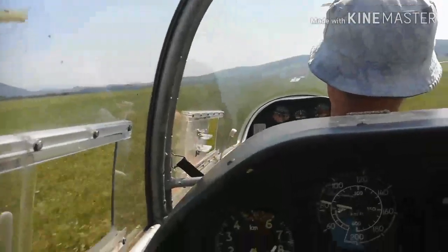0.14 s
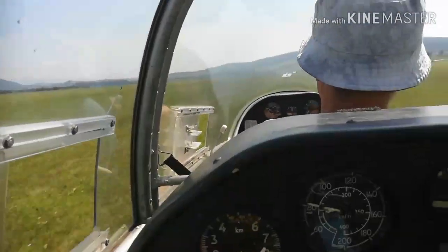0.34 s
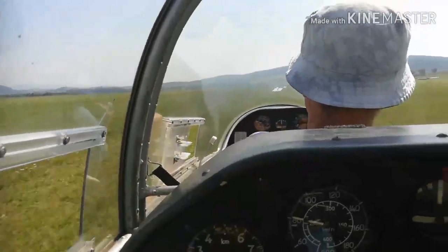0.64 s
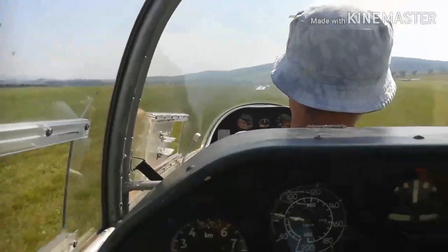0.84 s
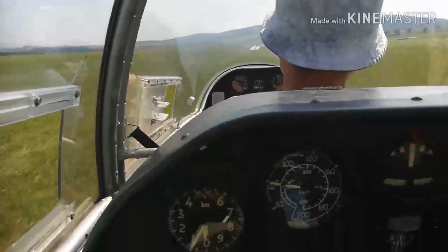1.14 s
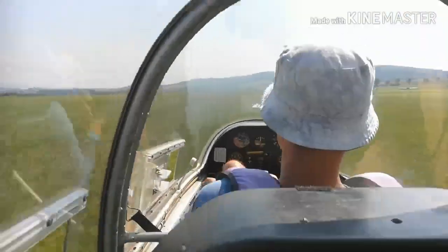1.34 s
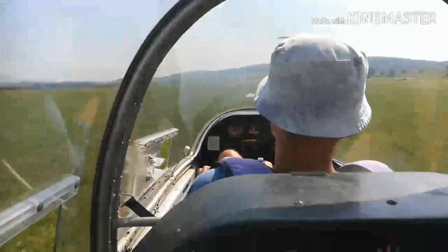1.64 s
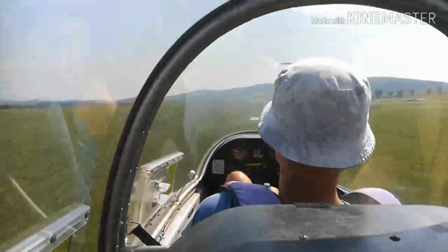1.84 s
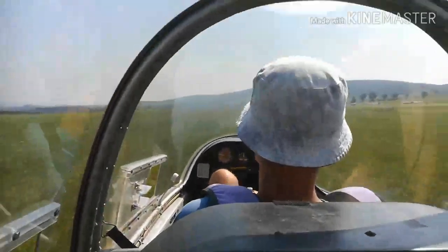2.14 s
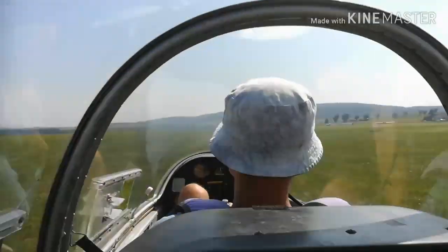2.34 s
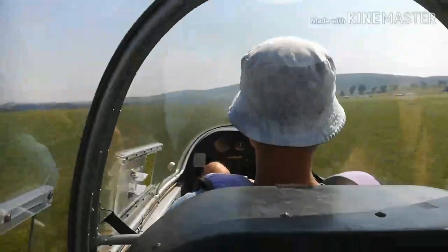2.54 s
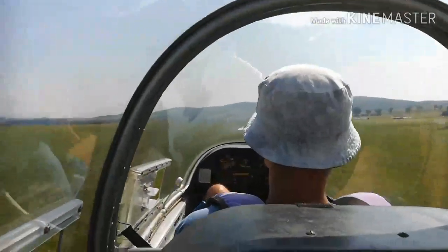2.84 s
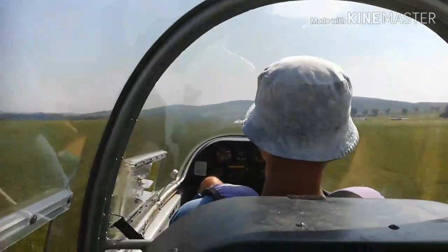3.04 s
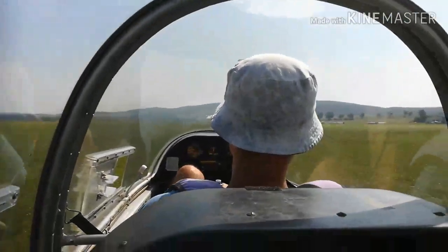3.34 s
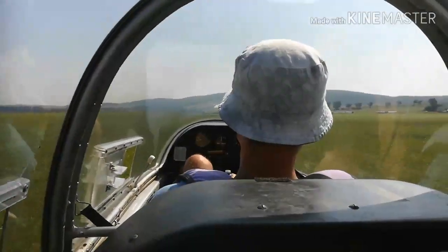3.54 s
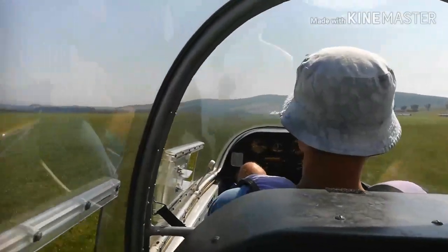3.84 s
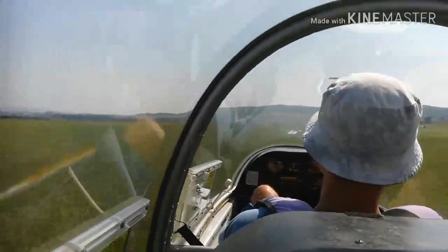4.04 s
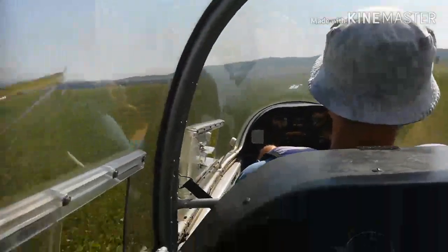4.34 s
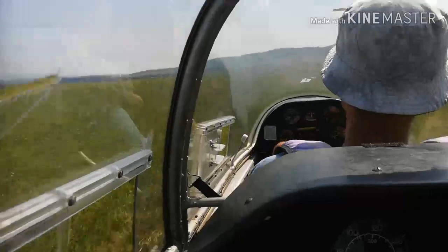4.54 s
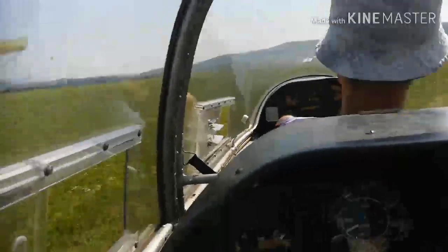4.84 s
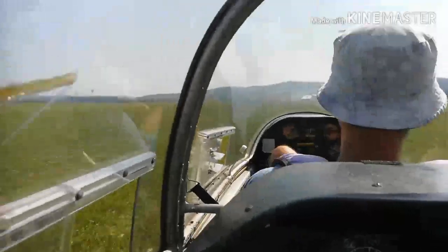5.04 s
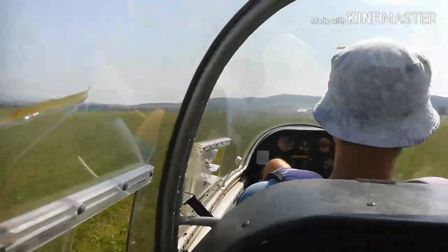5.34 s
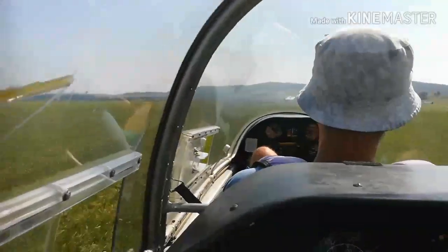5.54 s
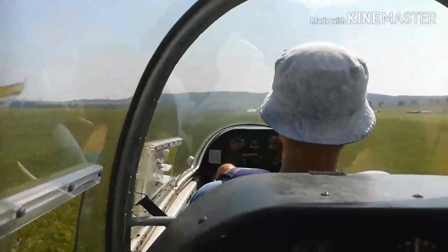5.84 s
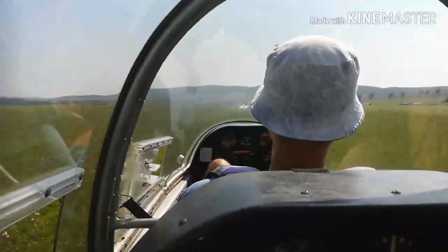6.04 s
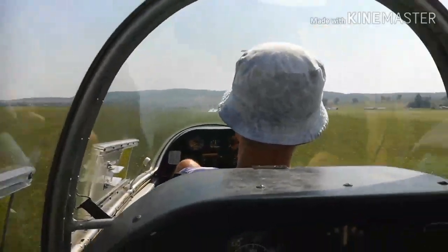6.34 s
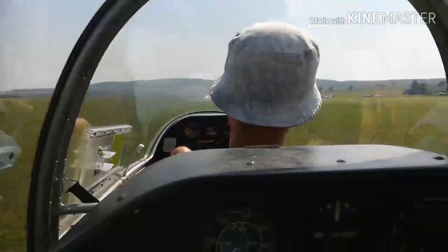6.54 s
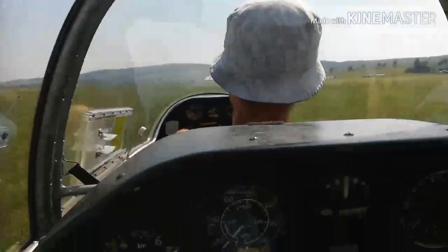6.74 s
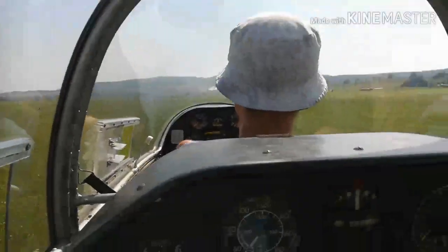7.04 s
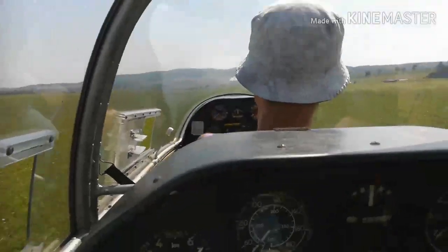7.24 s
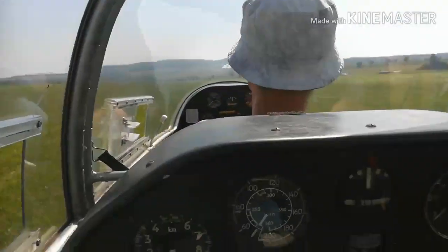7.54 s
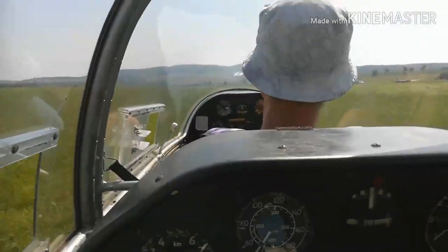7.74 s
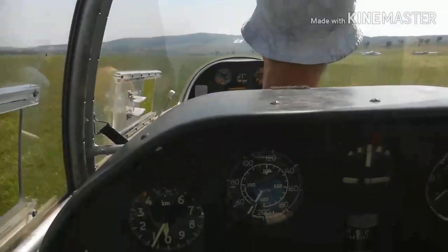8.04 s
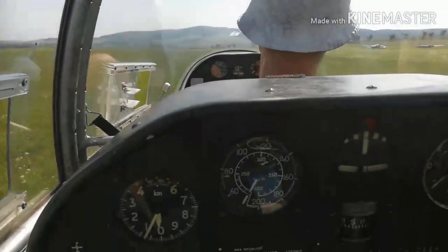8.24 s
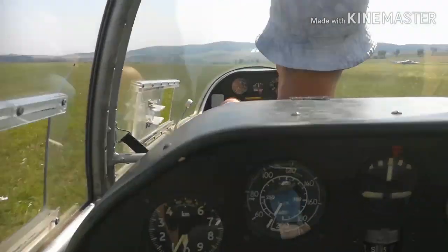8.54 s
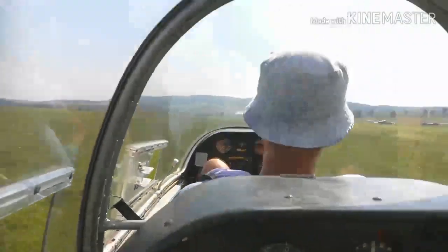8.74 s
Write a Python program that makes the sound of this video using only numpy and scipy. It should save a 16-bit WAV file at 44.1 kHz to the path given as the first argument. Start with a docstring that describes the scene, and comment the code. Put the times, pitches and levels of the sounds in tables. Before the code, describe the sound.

A handheld stereo microphone in a cramped, hollow cabin hears bass-heavy, lumpy rumbling from the wheel on turf. It is loudest at first, with broad mid drumming and soft hiss; a massive dropping thump distorts around 1.8 seconds. The roll then slows: hiss and drumming sink, while small knocks, bright ticks and dull tuft bumps stand out, with brief dragging scrapes close to eight seconds.

```python
"""Glider rollout over rough grass

Inside the cockpit of a glider that rolls out over rough grass and slows down.
Bumps under the wheel boom in the hollow fuselage and drum its skin: noise through resonances and spectra.
Shaped noise makes the hiss of air and grass; short noise bursts make loose fittings knock, tick and ping.
The belly scrapes through tufts, and one hard jolt, a falling sine, overloads the two-port microphone."""
import sys
import numpy as np
from scipy import signal
from scipy.fft import rfft, irfft, next_fast_len
from scipy.io import wavfile
from scipy.ndimage import uniform_filter1d

SR = 44100
rng = np.random.default_rng(int(sys.argv[2]) if len(sys.argv) > 2 else 0)


def dump_mix(stems):
    """Bounce the given channels to the path in sys.argv[1] as a 16-bit WAV at rate SR."""
    frames = np.atleast_2d(stems).T  # one column per channel
    limited = np.clip(frames, -1, 1)  # hard clip at full scale
    pcm = np.round(limited * 32767).astype(np.int16)
    wavfile.write(sys.argv[1], SR, pcm)


def linear_from_db(decibels):
    """Turn decibels (scalar or array-like) into linear amplitude factors; 0 gives 1."""
    return 10 ** (np.asarray(decibels, float) / 20)


N = 392049

# rolling boom as the ground changes and the speed falls: (time [s], wheel boom [dB], shell boom [dB])
ROLL_LEVELS = [(0.0, -16, -14.5), (0.3, -23.5, -18.5), (0.8, -20, -14), (1.05, -17, -21.5), (1.5, -16, -18),
               (1.78, -17, -18.5), (1.92, -25, -24), (2.35, -17, -22), (2.55, -25, -23.5),
               (3.55, -20, -22.5), (3.72, -22, -27), (3.9, -24, -22.5), (4.5, -15, -24.5), (5.1, -18, -23),
               (5.65, -21.5, -24), (6.75, -18, -29.5), (7.3, -19, -26), (7.52, -19.5, -28.5),
               (7.575, -15.5, -24.5), (7.63, -19.5, -33.5), (7.72, -25, -30.5), (7.79, -14, -35),
               (7.83, -23.5, -18.5), (7.95, -19.5, -26), (8.07, -23.5, -24), (8.13, -17.5, -27.5),
               (8.25, -20, -32), (8.89, -17.5, -32)]
# heavy airframe modes under the seat: (frequency [Hz], width before widening [Hz], level [dB])
FRAME_MODES = [(39.3, 23.5, 2.5), (52, 13.6, -3.5), (61.3, 5.1, -6.5), (69.5, 22.7, -1.5), (88, 53.3, -5.5)]
# hollow shell modes: (frequency [Hz], width before widening [Hz], level [dB])
SHELL_MODES = [(113.8, 68, 2.5), (155.1, 38.2, 0.5), (202.5, 32.8, 1.5), (232.6, 46, 1.5), (278, 77, -7.5),
               (331, 104, -17.5), (425, 172, -17)]
# spectrum of the drumming skin: (frequency [Hz], relative density [dB per Hz])
SKIN_SPECTRUM = [(260, -51), (450, -14), (613, -2), (709, -3), (1020, -7), (1170, -10), (1590, -10),
                 (2160, -13), (2320, -16.5), (3500, -24.5), (4550, -27), (7700, -120)]
# spectrum of air and grass: (frequency [Hz], relative density [dB per Hz])
HISS_SPECTRUM = [(1290, -51), (2200, -24), (2940, -13.5), (3300, -10.5), (7050, -12), (9490, -19.5),
                 (11000, -31), (14300, -64), (22000, -120)]
# thin top of the hiss: (frequency [Hz], relative density [dB per Hz])
TOP_SPECTRUM = [(8000, -39), (10500, 4.5), (13300, 0.5), (14600, 3), (15300, 4), (16000, -22)]
# noise beds: (time [s], skin drumming [dB], hiss of air and grass [dB], thin top of the hiss [dB])
RUSH_LEVELS = [(0.0, -36, -49.5, -64), (0.99, -35.5, -52.5, -67), (1.46, -36.5, -49.5, -61),
               (1.71, -36.5, -50.5, -66), (2.08, -41, -54.5, -67), (2.47, -42.5, -55.5, -70),
               (3.17, -42.5, -51, -63), (3.76, -43, -52, -65.5), (4.06, -42, -52.5, -65),
               (4.21, -42, -55, -65), (5.1, -43.5, -55.5, -68), (5.54, -43.5, -52, -65.5),
               (5.97, -45, -57, -70.5), (7.33, -47, -58.5, -71), (7.65, -49, -56.5, -70),
               (7.92, -47.5, -55, -68), (8.42, -50.5, -63.5, -76), (8.89, -49, -59, -72)]
# panels that a loose fitting knocks: (frequency [Hz], level [dB], ring scale [s]); width is inverse to the scale
PANEL_MODES = [(715, 7.5, 0.08), (875, 5.5, 0.057), (1050, -3.5, 0.072), (1320, -5.5, 0.035),
               (1620, -2.5, 0.069), (1980, -2, 0.018), (2114, -4, 0.18), (2396, -4, 0.016),
               (3080, -14, 0.011), (4020, -9, 0.005), (4920, -4.5, 0.0048), (6360, -32, .01)]
# single knocks: (time [s], level of the first 700 samples [dB], loudest region [Hz])
KNOCK_HITS = [(0.2014, -32, 1200), (0.205, -30.5, 2250), (0.211, -26.5, 1450), (0.26, -35, 1270),
              (1.803, -32, 1340), (1.812, -31, 900), (1.824, -32.5, 1560), (1.832, -35, 1300),
              (1.845, -36.5, 1800), (1.858, -35, 1060), (2.0596, -42, 1300), (3.95, -36, 1290),
              (3.958, -41, 2300), (3.967, -53, 1210), (4.239, -41, 1120), (4.362, -55.5, 2530),
              (4.445, -43, 1830), (4.522, -35.5, 1000), (4.54, -42, 1600), (4.623, -43, 1140),
              (4.6545, -41.5, 2170), (4.7256, -55, 2000), (4.801, -46, 2000), (4.9446, -48, 1800),
              (5.014, -44, 2180), (5.315, -39, 1120), (5.3322, -38.5, 1820), (5.3507, -36, 1840),
              (5.372, -41.5, 1300), (5.388, -41, 1100), (5.4047, -35, 1860), (5.411, -38, 1290),
              (5.4174, -37.5, 1820), (5.426, -40.5, 1090), (5.434, -38, 990), (5.461, -43, 1620),
              (5.48, -44, 1350), (5.534, -40, 1640), (6.035, -53, 1500), (6.062, -45, 1600),
              (6.1075, -41.5, 1350), (6.142, -49, 1400), (6.157, -42.5, 1700), (6.2116, -39.5, 1860),
              (6.258, -46, 1690), (6.4484, -42.5, 1700), (6.469, -43, 1840), (6.663, -45, 1710),
              (6.69, -43, 1770), (6.7087, -42, 1700), (6.7623, -49, 1500), (6.795, -47, 1700),
              (6.866, -53, 1500), (6.93, -42.5, 1700), (6.952, -48, 1500), (7.003, -55, 1600),
              (7.027, -46.5, 1300), (7.047, -49, 1700), (7.088, -47, 1790), (7.111, -40, 1580),
              (7.1802, -40.5, 1710), (7.211, -42.5, 1730), (7.221, -47, 2480), (7.278, -51, 1400),
              (7.394, -43.5, 1500), (7.438, -46, 1700), (7.4945, -41.5, 1720), (7.5097, -41, 1600),
              (7.523, -42, 1400), (7.535, -39, 1690), (7.559, -43, 1590), (7.769, -45.5, 2200),
              (7.929, -50, 2220), (8.038, -54, 2820), (8.232, -43, 1510), (8.242, -45.5, 1300),
              (8.331, -42.5, 1000), (8.605, -49, 1500), (8.675, -45.5, 1100), (8.7715, -44, 1980),
              (8.781, -43, 2610), (8.791, -42.5, 1500), (8.815, -54, 1500)]
# bright ticks of small parts: (time [s], level [dB], brightness [dB before each band takes its share])
TICK_HITS = [(0.2, -22, 0), (0.4973, -35, -1), (0.5222, -31, 2.5), (0.7906, -30.5, 0), (1.4162, -31.5, 4),
             (1.7946, -22, -3), (1.8015, -30, 22), (1.8154, -30, -16), (1.829, -36, -9),
             (1.8794, -30, -1.5), (2.035, -27, 3), (2.6833, -33, 3), (2.7696, -41, 9), (2.8524, -37, 10),
             (3.1694, -34, 8), (3.2695, -36, 7), (3.4471, -47, 14), (3.919, -39, 9), (3.949, -35, -4),
             (4.1094, -32, 3), (4.1659, -33, 1), (4.365, -40, 12), (4.6506, -27.5, 1), (4.8005, -33.5, -1),
             (4.9721, -33.5, 4), (5.3018, -41.5, 18), (5.33, -36, -6), (5.409, -30, 0), (5.4144, -41, 10),
             (5.8494, -43, 13), (6.2043, -44, 14), (6.222, -38, -1), (6.375, -38, 0), (6.69, -37, -2),
             (6.935, -41, -2), (7.355, -36, -2), (7.512, -40, 3), (7.878, -30, 5), (8.1244, -41, 12),
             (8.184, -37, 7), (8.33, -46, -5), (8.4915, -48, -3), (8.557, -26.5, 5.5), (8.5969, -40, 15),
             (8.6532, -38, -1)]
# spectrum of a tick: (frequency [Hz], relative density [dB per Hz])
TICK_SPECTRUM = [(1500, -48), (2500, -9), (4200, -8), (5200, -5), (8500, 2.5), (12000, -18.5), (16000, -16)]
# hard jolt: (time [s], starting swing, first pitch [Hz], last pitch [Hz], pitch fall constant [s], t60 [s])
JOLT_THUMP = (1.7965, 1.9, 155, 28, .012, .12)
# the shell rings with the jolt: (frequency [Hz], starting swing, t60 [s])
JOLT_SHELL_RING = (270, 0.34, 0.085)
# single tufts that thump the shell: (time [s], level before the soft rise [dB])
TUFT_BUMPS = [(0.467, -7), (0.644, -20), (0.777, -17.5), (0.901, -10), (1.281, -6), (1.345, -30),
              (1.609, -24), (1.795, 5.5), (2.26, -26), (2.544, -30), (3.425, -18.5), (3.773, -9),
              (3.858, -11), (4.147, -4), (4.712, -28), (5.312, -3.5), (5.383, -9.5), (6.246, -14),
              (6.492, -12.5), (7.537, -9), (7.741, -18.5), (8.285, -27), (8.66, -17), (8.813, -16.5)]
# the belly drags through a tuft: (time [s], level [dB], hold length [s])
TUFT_DRAGS = [(7.811, -34, .105), (7.928, -33, .085), (8.025, -37, .04)]
# resonances of the dragged belly: (frequency [Hz], width before widening [Hz], level [dB])
BELLY_MODES = [(453, 66, 4), (600, 105, 6), (900, 160, 0), (1300, 380, -5)]
# a small metal part pings: (time [s], level [dB])
PING_HITS = [(5.3991, -37), (8.2287, -40)]
# modes of that part: (frequency [Hz], level [dB], t60 [s])
PING_MODES = [(4850, 1, 0.03), (7440, -4, 0.025)]
# noise bands that come and go: (time [s], half length [s], frequency [Hz], filter width [Hz], level [dB])
HUM_BANDS = [(.62, .25, 875, 25, -45), (3.67, .1, 7600, 120, -66), (4.12, .06, 7450, 150, -65),
             (3.35, .1, 4900, 100, -66), (3.4, .13, 3200, 90, -62), (6.9, .9, 8250, 80, -75),
             (3.5, .75, 15200, 500, -72)]
# how far the two ports hear the same sound: (frequency [Hz], likeness [0 to 1])
PORT_LIKENESS = [(30, .999), (80, 1), (140, 0.99), (230, 0.96), (350, 0.57), (700, 0.65), (1500, 0.2),
                 (4000, 0.041), (15000, 0.14)]
# lead of the left port in the shared sound: (frequency [Hz], phase [radians])
PORT_LEAD = [(0, 0), (260, 0), (690, 3.5), (1120, 6.2), (1600, 6.7), (2700, 3.2), (4400, 3.3), (6900, 4.8)]
# balance of the ports: (frequency [Hz], left minus right [dB])
PORT_TILT = [(60, 0.5), (110, -1), (200, 0.0), (380, 2), (700, 1.5), (1290, -5.5), (2380, -3.5),
             (4400, 0.5), (8120, 6.5), (15000, 3)]


def evened(x):
    """Scales to rms 1."""
    return x / np.sqrt(np.mean(x ** 2) + 1e-20)


def read(points, hz):
    """Reads a table on a log-frequency axis."""
    f, value = np.transpose(points)
    return np.interp(np.log(hz + 1), np.log(f + 1), value)


def colour(x, points):
    """Shapes the spectrum by a table of dB."""
    size = next_fast_len(N)
    gain = linear_from_db(read(points, np.fft.rfftfreq(size, 1 / SR)))
    return irfft(rfft(x, size) * gain, size)[..., :N]


def ring(x, hz, width):
    """One resonance with gain near 1 at its centre."""
    r = np.exp(-np.pi * width / SR)
    return signal.lfilter([1 - r, 0, r - 1], [1, -2 * r * np.cos(2 * np.pi * hz / SR), r * r], x)


def ring_twice(x, hz, width):
    """The same resonance applied twice for steep skirts, at rms 1."""
    return evened(ring(ring(x, hz, width), hz, width))


def dull(x, edge_hz):
    """Heavy panels radiate little above edge_hz."""
    return signal.sosfilt(signal.butter(2, edge_hz, fs=SR, output="sos"), x)


def wander(per_s):
    """Slow chance of rms 1 that changes about per_s times a second."""
    size = int(SR / per_s)
    return evened(uniform_filter1d(uniform_filter1d(rng.standard_normal(N), size), size))


def bursts(times, gains, t60s, rise_s):
    """Envelope of quick rises and exponential decays."""
    env = np.zeros(N)
    for start, gain, t60 in zip(times, gains, t60s):
        part = env[round(start * SR):][:round(t60 * SR)]
        u = np.arange(len(part)) / SR
        part += gain * linear_from_db(-60 * u / t60) * (1 - np.exp(-u / rise_s))
    return env


def levels(table, t):
    """Gain curves from a table of times and dB columns."""
    times, *columns = np.transpose(table)
    return [linear_from_db(np.interp(t, times, db)) for db in columns]


def hum(t):
    """Narrow bands of noise come and go."""
    out = np.zeros((2, N))
    for s, half_length, hz, width, db in HUM_BANDS:
        swell = np.exp(-((t - s) / half_length) ** 4)
        out += linear_from_db(db) * swell * ring_twice(rng.standard_normal((2, N)), hz, width)
    return out


def rush(points, shake, shake_db, patchy_db, streaky_db):
    """Noise that follows the shaking, uneven in broad patches and in narrow, longer-lasting streaks."""
    frames = N // 256 + 6
    real, imag = rng.standard_normal((2, 2, 513, frames))
    # patches span many frequency bins; streaks stay in one bin and last longer
    patches = uniform_filter1d(uniform_filter1d(rng.standard_normal((513, frames)), 32, 0), 10, 1)
    streaks = uniform_filter1d(rng.standard_normal((513, frames)), 25, 1)
    field = linear_from_db(patchy_db * evened(patches) + streaky_db * evened(streaks))
    noise = signal.istft((real + 1j * imag) * field, nperseg=1024, noverlap=768)[1][:, :N]
    return evened(colour(noise * linear_from_db(shake_db * shake), points))


def chatter():
    """Many weak knocks of the same panels, in clumps."""
    hit = rng.random(N) < 70 * linear_from_db(3 * wander(per_s=8)) / SR
    strength = linear_from_db(1.3 * np.minimum(rng.exponential(1, N), 3))
    decay_s = 0.006
    env = signal.lfilter([1], [1, -np.exp(-1 / (decay_s * SR))], hit * strength)
    blows = env * rng.standard_normal((2, N))
    panels = sum(linear_from_db(db) * ring(blows, hz, 2.0 / scale_s) for hz, db, scale_s in PANEL_MODES)
    return linear_from_db(-59.0) * evened(dull(panels, edge_hz=3400))


def ticks(hiss):
    """Sharp puffs of treble in two bands for brightness, plus a faint sprinkle that follows the hiss."""
    s, db, bright_db = np.transpose(TICK_HITS)
    faint = rng.random((130, 3))  # chance of time, level and decay
    at = faint[:, 0] * (N - 1) / SR
    sprinkle = hiss * bursts(at, linear_from_db(6 * faint[:, 1] - 7), .04 + .05 * faint[:, 2], rise_s=.005)
    puff = evened(colour(rng.standard_normal((2, N)), TICK_SPECTRUM))
    split_hz = 8000
    upper = signal.sosfilt(signal.butter(2, split_hz, "high", fs=SR, output="sos"), puff)
    lower = signal.sosfilt(signal.butter(2, split_hz, "low", fs=SR, output="sos"), puff)
    out = np.zeros((2, N))
    for share, band, t60 in ((0.28, upper, 0.073), (-0.06, lower, 0.09)):
        env = bursts(s, linear_from_db(db + share * bright_db), [t60] * len(s), rise_s=0.004)
        out += (sprinkle * linear_from_db(-1.2 * share) + env) * band
    return out


def pings():
    """Short, slightly rough modes of a small part."""
    s, db = np.transpose(PING_HITS)
    out = np.zeros((2, N))
    for hz, level_db, t60 in PING_MODES:
        env = bursts(s, linear_from_db(db + level_db), [t60] * len(s), rise_s=.0015)
        out += env * evened(ring(rng.standard_normal((2, N)), hz, 250))
    return out


def knocks():
    """A soft-edged blow and an uneven rattle drive damped panel modes near a loudest region, plus a broad crunch."""
    out = np.zeros((2, N))
    size = 4000  # samples
    u = np.arange(size) / SR
    rattle_s, rattle_spread = 0.021, 0.15  # decay of the rattle, and its log spread from knock to knock
    focus_db = 3  # loss per octave away from the loudest region
    crunch_hz, crunch_db = (1000, 4430), -11  # band, and gain beside the modes
    crunch_band = signal.butter(1, crunch_hz, "band", fs=SR, output="sos")
    for s, db, centre_hz in KNOCK_HITS:
        length = rattle_s * np.exp(rattle_spread * rng.standard_normal())
        uneven = linear_from_db(1.6 * evened(uniform_filter1d(rng.standard_normal(size), 130)))  # bounces of about 3 ms
        env = (np.exp(-u / length) + 0.7 * np.exp(-u / 0.007)) * (1 - np.exp(-u / 0.0013))
        blows = rng.standard_normal((2, size)) * uneven * env
        # the firm blow: a short tone pulse, a quarter turn apart in the two draws
        pulse = np.exp(-((u - .002) / .001) ** 2)
        blows += 1.8 * pulse * np.cos(2 * np.pi * centre_hz * u - [[0], [np.pi / 2]])
        panels = np.zeros((2, size))
        for hz, level_db, scale_s in PANEL_MODES:
            width = 5.5 / scale_s
            gain = linear_from_db(level_db - focus_db * abs(np.log2(hz / centre_hz)))
            panels += gain * ring(blows, hz * rng.uniform(0.93, 1.07), width) / np.sqrt(width)
        crunch = evened(signal.sosfilt(crunch_band, blows))
        sound = evened(dull(panels, edge_hz=4560)) + linear_from_db(crunch_db) * crunch
        part = out[:, round(s * SR):][:, :size]
        part += (linear_from_db(db) * sound / np.std(sound[:, :700]))[:, :part.shape[1]]
    return out


def drags(t):
    """Rough scraping that starts at once, holds and lets go, through the belly's resonances."""
    env = np.zeros(N)
    for s, db, length in TUFT_DRAGS:
        start = np.clip((t - s) / 0.0022, 0, 1)
        sag = linear_from_db(-15 * np.maximum(t - s, 0))  # loses 15 dB per second
        env += linear_from_db(db) * start * sag / (1 + (abs(t - s) / length) ** 6)
    rub = rng.standard_normal((2, N)) * linear_from_db(1.8 * wander(per_s=80))
    return env * evened(sum(linear_from_db(db) * ring_twice(rub, hz, w * 1.2) for hz, w, db in BELLY_MODES))


def boom(modes, lumps):
    """Ground roughness, uneven from tuft to tuft, drives broad modes."""
    ground = rng.standard_normal((2, N)) * lumps
    return evened(sum(linear_from_db(db) * ring_twice(ground, hz, w * 1.334) for hz, w, db in modes))


def rolling(t):
    """The same uneven ground booms in airframe and shell; tufts thump the shell and the jolt interrupts."""
    wheel, shell = levels(ROLL_LEVELS, t)
    s, db = np.transpose(TUFT_BUMPS)
    thumps = bursts(s, linear_from_db(db), [0.11] * len(s), rise_s=0.018)
    shell = np.hypot(shell, thumps)
    uneven = wander(per_s=11)
    frame_boom = boom(FRAME_MODES, linear_from_db(1.2 * uneven))
    shell_boom = dull(dull(boom(SHELL_MODES, linear_from_db(1.3 * uneven)), edge_hz=740), edge_hz=740)
    calm_share, calm_at_s, calm_s = 0.65, 1.812, 0.022  # depth, centre and half length of the interruption
    calm = 1 - calm_share * np.exp(-((t - calm_at_s) / calm_s) ** 4)
    return calm * (wheel * frame_boom + shell * shell_boom)


def jolt(t):
    """The wheel slams a ridge: the airframe swings hard and slows as it settles, and the shell rings."""
    s, swing, first_hz, last_hz, fall, t60 = JOLT_THUMP
    u = np.maximum(t - s, 0)
    turns = last_hz * u + (first_hz - last_hz) * fall * (1 - np.exp(-u / fall))  # phase of the falling pitch
    thump_env = swing * (1 - np.exp(-(u / 0.0053) ** 2)) * linear_from_db(-60 * u / t60)
    hz, shell_swing, shell_t60 = JOLT_SHELL_RING
    shell_env = shell_swing * (1 - np.exp(-u / 0.0015)) * linear_from_db(-60 * u / shell_t60)
    return thump_env * np.sin(2 * np.pi * turns) - shell_env * np.sin(2 * np.pi * hz * u)


def scene():
    """Two draws of noise under the same timing and the same jolt; the microphone ports mix them."""
    t = np.arange(N) / SR
    skin, hiss, top = levels(RUSH_LEVELS, t)
    shake = wander(per_s=35) + .5 * wander(per_s=14)  # one shaking swells skin and hiss together
    mix = skin * rush(SKIN_SPECTRUM, shake, shake_db=1.1, patchy_db=0.3, streaky_db=2.6)
    mix += hiss * rush(HISS_SPECTRUM, shake, shake_db=1.24, patchy_db=0.8, streaky_db=2.8)
    mix += top * rush(TOP_SPECTRUM, shake, shake_db=1.1, patchy_db=1.4, streaky_db=2.4)
    mix += hum(t) + chatter() + ticks(hiss) + pings() + knocks() + drags(t)
    return mix + rolling(t) + jolt(t)


def low_pass(x):
    """Removes everything above the highest recorded frequency."""
    return signal.sosfilt(signal.butter(12, 16150, fs=SR, output="sos"), x)


def record(dry):
    """Two ports hear the bass alike and the treble apart; the deepest bass is cut and peaks overload softly."""
    size = next_fast_len(N)
    hz = np.fft.rfftfreq(size, 1 / SR)
    cut_hz, edge_hz = 33, 15650  # steep bass cut, and the top edge of the treble
    a, b = rfft(dry, size) / np.sqrt(1 + (cut_hz / (hz + 1)) ** 10) * (hz < edge_hz)
    alike = np.clip(read(PORT_LIKENESS, hz), 0, 1)
    right = alike * np.exp(-1j * read(PORT_LEAD, hz)) * a + np.sqrt(1 - alike ** 2) * b
    half_db = read(PORT_TILT, hz) / 2
    ports = irfft(np.array([a * linear_from_db(half_db), right * linear_from_db(-half_db)]), size)[:, :N]
    overloaded = ports / (1 + abs(ports) ** 6) ** (1 / 6)
    return low_pass(overloaded)


dry = scene()
out = record(dry)
dump_mix(out)
```